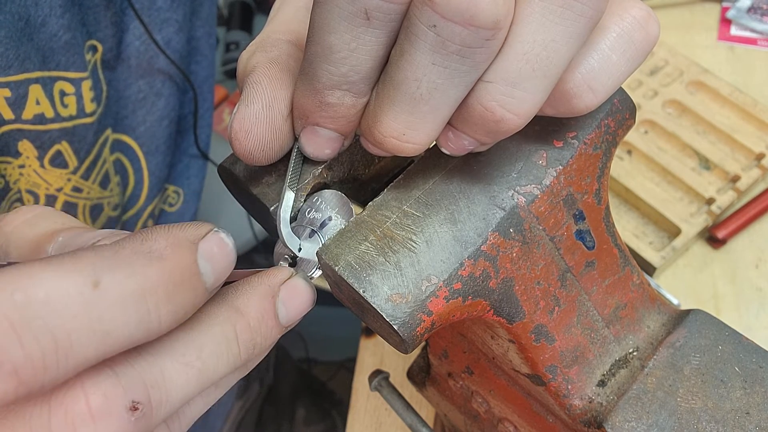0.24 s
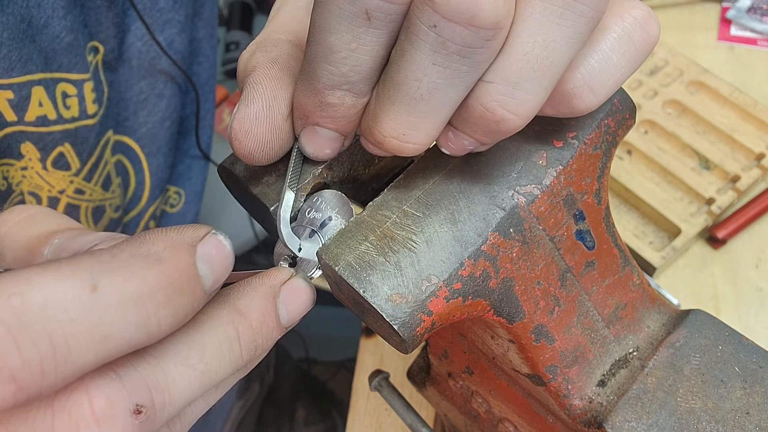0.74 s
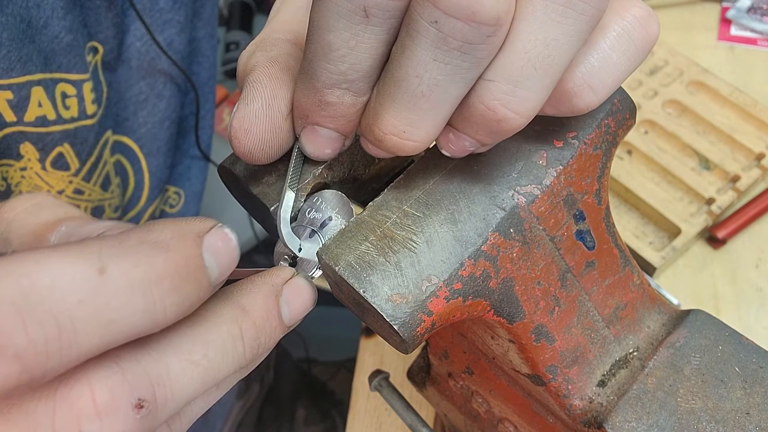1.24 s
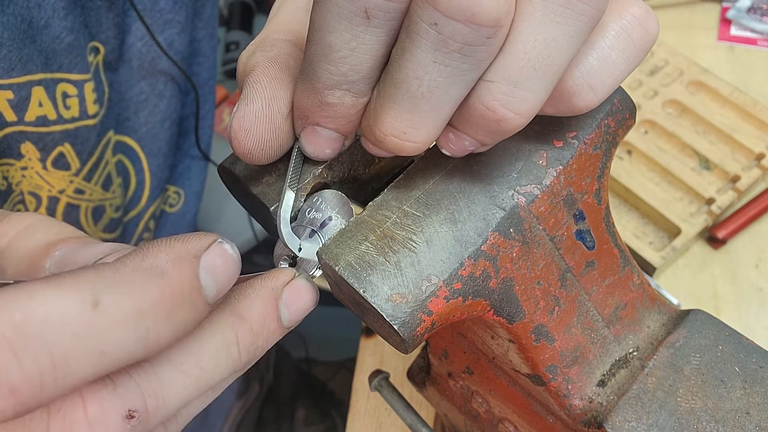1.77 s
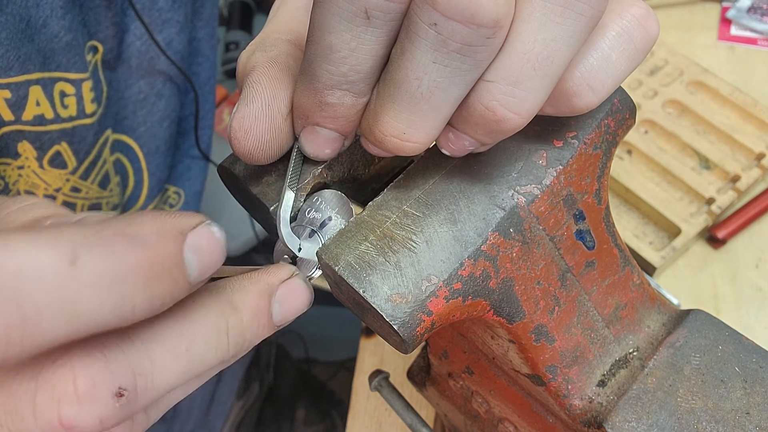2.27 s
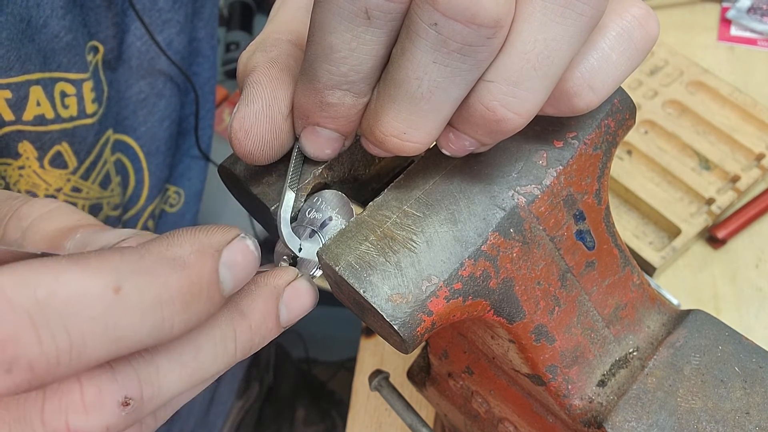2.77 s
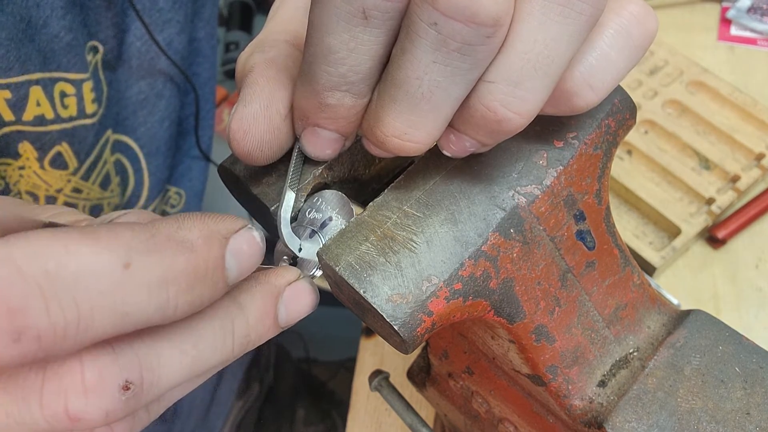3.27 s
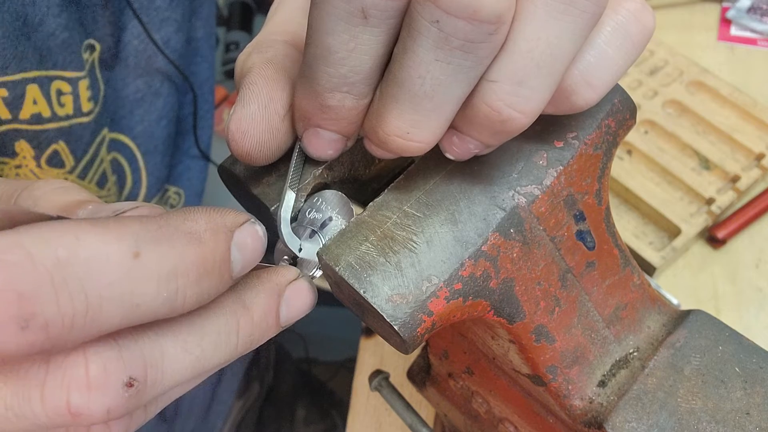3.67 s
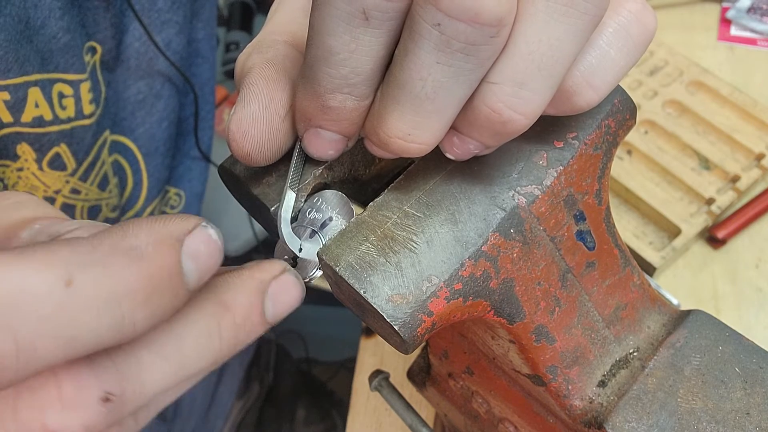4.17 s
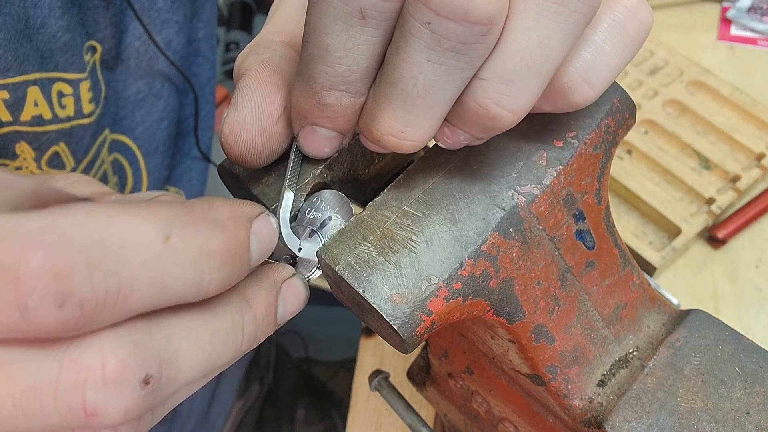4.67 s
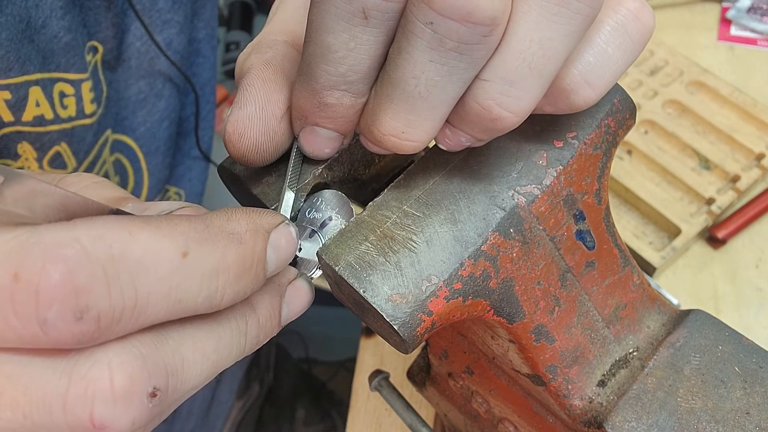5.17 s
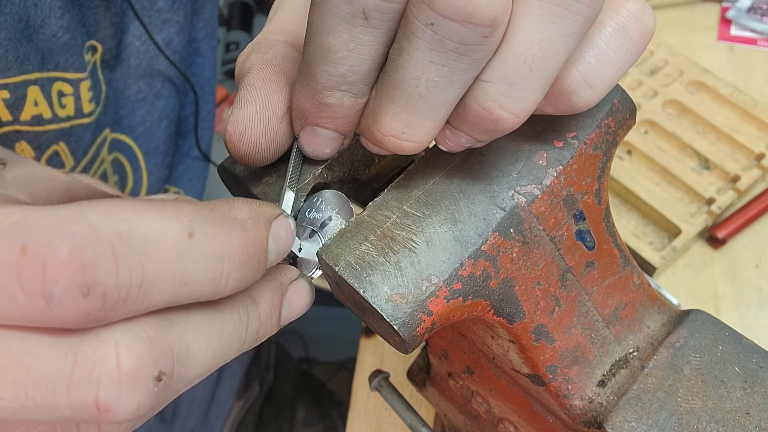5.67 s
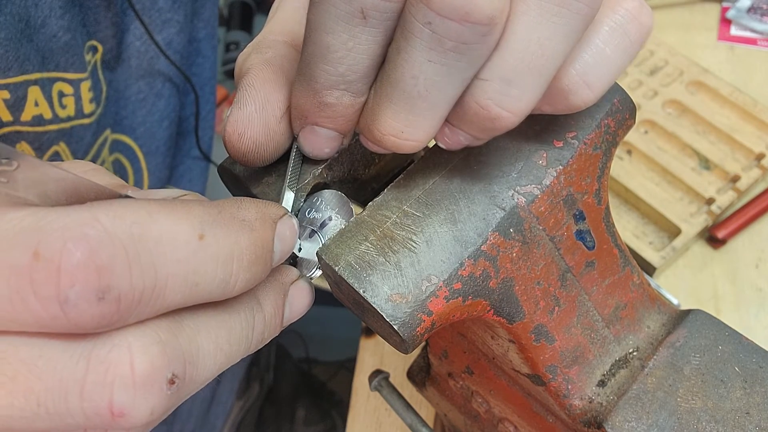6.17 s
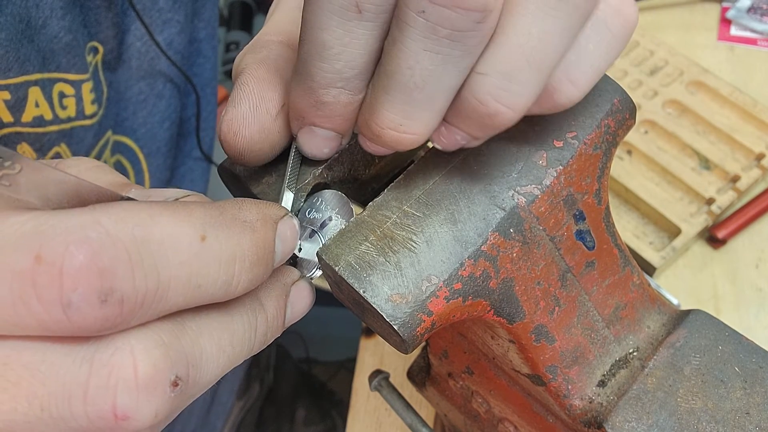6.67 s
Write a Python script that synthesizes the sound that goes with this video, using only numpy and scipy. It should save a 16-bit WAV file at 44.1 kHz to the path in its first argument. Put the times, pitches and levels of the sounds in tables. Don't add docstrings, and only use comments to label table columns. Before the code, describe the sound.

Crisp metallic clicks and tiny scratches of a pick inside a clamped lock cylinder, separated by pauses filled with a low unsteady hum.

```python
import sys
import numpy as np
from scipy import signal
from scipy.fft import next_fast_len
from scipy.io import wavfile
from scipy.ndimage import uniform_filter1d

SR = 44100
rng = np.random.default_rng(int(sys.argv[2]) if len(sys.argv) > 2 else 0)


def unload_audio(sound):
    columns = np.transpose(np.atleast_2d(sound))
    steps = np.round(np.clip(columns, -1, 1) * 32767)
    wavfile.write(sys.argv[1], SR, steps.astype(np.int16))


def rack_gain(trim_db):
    fader = np.asarray(trim_db, float)
    return 10 ** (fader / 20)


N = 306035

# t/s, tone level/dB, flutter depth [0-1, clipped above]
HUM = [(0, -40, 0.82), (.35, -48.5, 0.43), (.75, -53.5, 0.54), (1.0, -44, 1.13), (1.4, -52.5, 0.2),
       (1.8, -49, 0), (2.2, -42, 0.8), (2.4, -46.5, 0.56), (2.6, -42, 0.27), (3.7, -45, 0),
       (3.96, -40, 0.48), (4.3, -56.5, 1.23), (4.8, -54, 0.3), (5.05, -44, 0.43), (5.5, -42, 0.4),
       (5.849, -48.5, 0.1), (6.15, -40, 0.42), (6.94, -45.5, 0)]
# f/Hz, level/dB
WHINE = [(119.9, -59.5), (178, -70.5), (210, -67.5), (309, -68.5), (480, -78.5), (540, -71.5), (660, -75.5),
         (1000, -79), (1485, -103), (1500.2, -72.5), (1521, -100), (3000.4, -84)]
# f/Hz, level/dB per Hz
RUMBLE = [(15, -17), (25, -61), (41, -13.5), (65, -2.5), (91, -6), (119, -16.5), (275, -20), (312, -20.5),
          (446, -23.5), (533, -26), (1190, -35.5), (1530, -36.5), (1800, -42), (2340, -102), (3960, -120)]
# f/Hz, level/dB per Hz
HISS = [(1060, -29), (1800, -7), (2300, -11), (2850, -9.5), (3050, -5.5), (4500, -5), (6800, -6.5),
        (7200, -15.5), (10000, -12.5), (12800, -14.5), (13150, -4), (14100, -10.5), (15750, -10),
        (16000, -51)]

# t/s, tip peak level/dB, shank peak level/dB, favoured shank f/Hz
TICKS = [(0.3055, -17, -18.5, 8940), (0.3072, -21, -21.5, 6100), (1.54, -56, -56, 7000),
         (1.7265, -66, -59, 6500), (1.7365, -60, -54, 7040), (1.747, -58, -55, 5500),
         (1.7735, -56, -58, 9000), (1.9978, -28, -29.5, 5000), (1.9993, -16, -20, 8440),
         (2.182, -31, -31.5, 5500), (2.1845, -33, -30.5, 6300), (2.1871, -32, -29, 8400),
         (2.2015, -46, -39, 9000), (2.2262, -36, -37, 9800), (2.228, -37, -38, 8000),
         (2.292, -49, -52, 7000), (2.3034, -58, -48, 8400), (2.4456, -52, -48, 8400),
         (2.578, -60, -53, 8400), (4.076, -28, -29.5, 7500), (4.083, -36, -31, 8400),
         (4.0885, -42, -40, 5000), (4.092, -32, -36, 5000), (4.0948, -42, -45, 8400),
         (4.1122, -24, -26.5, 9300), (4.1187, -40, -41, 7500), (4.1273, -38, -40, 8400),
         (4.13, -34, -33, 6500), (4.132, -40, -39, 6000), (4.151, -62, -50, 9300), (4.1642, -24, -28, 8400),
         (4.1676, -22, -25, 8400), (4.1722, -25, -23, 9300), (4.1772, -24, -26, 7500),
         (4.18, -26, -24.5, 7400), (4.2332, -42, -33.5, 8400), (4.2445, -54, -39, 8600),
         (4.362, -56, -54, 8600), (4.4005, -56, -48, 5300), (4.4055, -41, -40.5, 6900),
         (4.5487, -47, -48, 6300), (4.585, -40, -34.5, 8400), (4.8428, -48, -37.5, 6200),
         (4.8506, -58, -41.5, 8005), (4.985, -58, -42, 7700), (4.99, -62, -46, 7700),
         (5.0152, -48, -34.5, 8400), (5.018, -52, -35, 5260), (5.108, -50, -58, 8400),
         (6.0404, -34, -31.5, 10200), (6.0412, -44, -42, 5740)]
# t/s, peak level/dB, favoured lock f/Hz
KNOCKS = [(0.3055, -36, 1600), (0.3072, -39, 3430), (1.54, -58, 2030), (1.7365, -67, 1562),
          (1.747, -63, 1600), (1.7735, -64, 1600), (1.9975, -37.5, 1880), (1.9993, -35.5, 3410),
          (2.182, -42.5, 1710), (2.1845, -40.5, 1830), (2.1871, -40, 2530), (2.205, -45, 1670),
          (2.2262, -47.5, 3100), (2.292, -54, 1560), (2.3034, -54, 3100), (2.4456, -60.5, 1709),
          (2.5442, -60, 1700), (2.578, -54, 1790), (2.757, -57, 1830), (4.068, -50, 1600),
          (4.076, -54, 1600), (4.0834, -40, 3180), (4.0935, -47.5, 1600), (4.1125, -42.5, 2760),
          (4.1165, -46, 3200), (4.1305, -43, 2170), (4.134, -47, 3200), (4.15, -53, 2030),
          (4.1642, -35, 3260), (4.1676, -37, 1670), (4.1722, -36.5, 2185), (4.1759, -37.5, 1820),
          (4.1802, -37, 3140), (4.234, -44.5, 2080), (4.245, -54, 1700), (4.4001, -48, 3175),
          (4.4044, -49.5, 3250), (4.5487, -55, 1790), (4.585, -46.5, 2170), (4.8428, -50, 1930),
          (4.849, -49.5, 2300), (4.985, -59, 3100), (5.0135, -50, 1630), (5.1073, -65, 1670),
          (6.0404, -55.5, 1670), (6.318, -56.5, 1950), (6.326, -57, 1690), (6.342, -59, 2000)]
# t/s, vise peak level/dB, favoured f/Hz
JOLTS = [(0.306, -33.5, 1196), (0.311, -42, 420), (1.9975, -40.5, 1180), (2.001, -40, 440),
         (2.187, -49, 1160), (4.079, -49, 450), (4.128, -48.5, 450), (4.166, -45, 1300), (4.172, -46, 1330),
         (5.02, -55, 800), (6.318, -52.5, 1100), (6.33, -60, 800), (6.362, -54, 1170)]
# t/s, level/dB
HARD_HITS = [
    (0.307, -56),
    (1.9985, -47),
    (4.167, -62),
]
# t/s, level/dB
TWANGS = [
    (2.206, -51),
    (5.0135, -46.5),
    (6.043, -61),
    (0.32, -54),
]
# start t/s, hardest t/s [held inside the stroke], end t/s [at least 0.011 after
# start], lock level/dB, shank level/dB against the lock
STROKES = [(1.46, 1.533, 1.64, -57.5, -20), (1.72, 1.74, 1.9, -70, -6), (2.187, 2.1, 2.21, -38, -11),
           (2.228, 2.08, 2.4, -57, -7.5), (2.264, 2.2, 2.34, -51.5, -12), (2.428, 2.6, 2.54, -60, -4),
           (2.51, 2.58, 2.55, -60, -18), (2.746, 2.84, 2.8, -62, -7), (3.947, 3.9, 4.2, -58.5, -18),
           (4.067, 4.069, 3.6, -47, -16), (4.079, 4.09, 4.2, -54, -3), (4.11, 3.3, 4.1, -46, -9),
           (4.1636, 4.168, 4.157, -27.5, -7.5), (4.171, 4.179, 4.191, -28.5, -7),
           (4.195, 4.242, 4.295, -56, -9), (4.331, 4.372, 4.47, -54.5, -13), (4.403, 4, 4.53, -54, -11),
           (4.525, 4.537, 4.6, -58, -5), (4.543, 4.553, 4.64, -56, -2.5), (4.552, 4.568, 4.54, -51, -11),
           (4.5, 4.56, 4.54, -56.5, -25), (4.587, 4.7, 4.2, -50.5, -8), (4.841, 4.847, 4.93, -51, -12),
           (4.984, 4.9, 5.26, -60, -6)]

# f/Hz, level/dB, time to fall 60 dB t/s
TIP = [(12000, -9, 0.0021), (13720, -0.5, 0.0052), (15100, -6.5, 0.0025), (16100, -16, .0015)]
# f/Hz, level/dB, time to fall 60 dB t/s
SHANK = [(4570, -20, 0.0044), (5000, -3.5, 0.0086), (6300, -1.5, .004), (7500, -1, 0.0056),
         (8400, 0, 0.0045), (9300, 0.5, 0.0046), (10200, 1, 0.0028), (11200, -11, 0.0012)]
# f/Hz, level/dB, time to fall 60 dB t/s
LOCK = [(1600, 7.5, 0.026), (1670, -3, 0.12), (1806, -6, 0.081), (1980, 1.5, 0.058), (2074, 2, 0.028),
        (2185, 0, 0.055), (2530, -3.5, 0.038), (2753, -3, 0.05), (3091, 1, 0.037), (3260, 0, 0.042),
        (3410, 1, 0.04), (4090, -13, 0.12)]
# f/Hz, level/dB, time to fall 60 dB t/s
VISE = [(420.5, 1, 0.095), (473, -8.5, 0.16), (849, -12, 0.14), (1097, 0.5, 0.043), (1170, -0.5, 0.049),
        (1279, 1.5, 0.093), (1333, -3, 0.051)]
# f/Hz, level/dB, time to fall 60 dB t/s
CLAMP = [(1850, 11, 0.08), (1850, -6, 0.16), (1940, 1, .16), (2760, 5, 0.046), (2820, -18, 0.22),
         (3360, 4, 0.065), (3450, -5.5, 0.49), (3480, 7, .12), (4150, 4, .045), (3980, -11, .2)]
# f/Hz, level/dB, time to fall 60 dB t/s
WRENCH = [(1650, -1.5, 0.25), (1593, -3, 0.2), (1660, -14, 0.14)]

# f/Hz, time to fall 60 dB t/s
ECHO_TIMES = [(400, 0.5), (1300, 0.4), (3000, 0.41), (6000, 0.39), (12000, 0.34)]
# f/Hz, level/dB
SOFT_WALLS = [(400, 8), (1500, 9), (4000, -0.5), (9000, -2), (14000, -4)]

HUM_HZ, HUM_DRIFT_HZ = 57.58, 0.66
RUMBLE_DB, HISS_DB = -49.5, -67
SNAP_DB, TOUCH_RING_SHARE = -21, 0.45
VISE_UNDER_LOCK_DB = -18
FIRM_DB = -50
FIRM_SCRAPE_HZ, LIGHT_SCRAPE_HZ, SHANK_SCRAPE_HZ = 2670, 1900, 6500
PRESS_DB, LIFT_DB = -8.5, -26
LOW_BLUR_RAD, HIGH_BLUR_RAD = 0.07, 0.4
BENCH_DB, BENCH_T60_S, BENCH_LOW_HZ, BENCH_HIGH_HZ = -6, 0.02, 2570, 11900
ROOM_DB, ECHO_EDGE_HZ = -10, 16000


def evened(x):
    return x / np.sqrt(np.mean(x ** 2) + 1e-20)


def read(points, hz):
    f, value = np.transpose(points)
    return np.interp(np.log(hz + 1), np.log(f + 1), value)


def add(mix, s, sound):
    part = mix[round(s * SR):][:len(sound)]
    part += sound[:len(part)]


def filtered(x, order, edge_hz, kind):
    return signal.sosfilt(signal.butter(order, edge_hz, kind, fs=SR, output="sos"), x)


def wander(low_hz, high_hz):
    t = np.arange(0, N + 256, 256) / SR
    speeds = np.geomspace(low_hz, high_hz, num=14)
    slow = sum(np.sin(2 * np.pi * (f * t + rng.random())) for f in speeds)
    return evened(np.interp(np.arange(N) / SR, t, slow))


def air(shape, size, patchy_db):
    frames, hz = N * 4 // size + 5, np.fft.rfftfreq(size, 1 / SR)
    a, b, patches = rng.standard_normal((frames, size // 2 + 1, 3)).T
    patches = uniform_filter1d(patches, size=12, axis=0)
    patches = evened(uniform_filter1d(patches, size=10, axis=1))
    spectra = (a + 1j * b) * rack_gain(read(shape, hz)[:, None] + patchy_db * patches)
    return evened(signal.istft(spectra, nperseg=size, noverlap=size * 3 // 4)[1][:N])


def machine():
    s, db, flutter = np.transpose(HUM)
    t = np.arange(N) / SR
    depth = np.clip(np.interp(t, s, flutter), 0, 1)
    swing = np.sqrt(1 - depth ** 2) + depth * wander(3.5, 19)
    turns = np.cumsum(HUM_HZ + HUM_DRIFT_HZ * wander(0.296, 7.3)) / SR
    sound = np.sqrt(2) * rack_gain(np.interp(t, s, db)) * swing * np.sin(2 * np.pi * turns)
    for f, whine_db in WHINE:
        level = np.sqrt(2) * rack_gain(whine_db + 2.74 * wander(0.522, 12))
        sound += level * np.sin(2 * np.pi * (f * t + rng.random()))
    rumble = rack_gain(RUMBLE_DB) * air(RUMBLE, size=4096, patchy_db=1.5)
    hiss = rack_gain(HISS_DB) * air(HISS, size=512, patchy_db=1.0)
    return sound + rumble + hiss


def ring(modes, spread_db, detune, near_hz=None, focus_db=0):
    hz, db, t60 = np.transpose(modes)[:, :, None]
    pitch_chance, level_chance = rng.standard_normal((2, len(modes), 1))
    t = np.arange(8000) / SR
    if near_hz:
        db = db - np.minimum(40 * abs(np.log2(hz / near_hz)), focus_db)
    signs = (-1) ** np.arange(len(modes))[:, None]
    waves = signs * np.sin(2 * np.pi * hz * (1 + detune * pitch_chance) * t)
    fading = rack_gain(db + spread_db * level_chance - 60 * t / np.maximum(t60, 0.002))
    return (fading * waves).sum(0)


def blow(modes, peak_db, chatter_s, first, near_hz=None, focus_db=0):
    t = np.arange(900) / SR
    blows = rng.standard_normal(900) * (1 - np.exp(-t / 0.00031)) * np.exp(-t / chatter_s)
    blows[8] += first * np.linalg.norm(blows)
    part = signal.fftconvolve(blows, ring(modes, 0.36, 0.012, near_hz, focus_db))
    return rack_gain(peak_db) * part / abs(part).max()


def tick(tip_db, shank_db, shank_hz):
    chatter_s = 0.0004 * rack_gain(0.2 * (max(tip_db, shank_db) + 30))
    held = 1 if tip_db > SNAP_DB else TOUCH_RING_SHARE
    tip_modes = [(hz, db + (1 - held) * hz / 2000 - 4, t60 * held) for hz, db, t60 in TIP]
    tip = blow(tip_modes, tip_db, chatter_s, 1.3)
    shank = blow(SHANK, shank_db, chatter_s + 0.0001, 0.85, shank_hz, focus_db=9.5)
    return tip[:4000] + shank[:4000]


def knock(lock_db, lock_hz):
    focus_db = np.clip(-0.45 * (lock_db + 22), 9, 14)
    lock = blow(LOCK, lock_db + 4.5, 0.0024, 1.46, lock_hz, focus_db)
    return lock + jolt(lock_db + VISE_UNDER_LOCK_DB)


def jolt(vise_db, vise_hz=None):
    return blow(VISE, vise_db + 5.5, 0.0051, 2.6, vise_hz, focus_db=7.5)


def scattered(x):
    low = filtered(x, 4, BENCH_LOW_HZ * 1.79, "low")
    high = filtered(x, 4, BENCH_LOW_HZ * 1.36, "high")
    steps = np.cumsum(rng.standard_normal(N))
    blurred = np.zeros(N)
    for part, rad in ((low, LOW_BLUR_RAD), (high, HIGH_BLUR_RAD)):
        turning = signal.hilbert(part, next_fast_len(N))[:N]
        blurred += (turning * np.exp(1j * rad * steps)).real
    return blurred


def take_turns(x, echoes, turn_s):
    turn = np.pi * np.arange(N) / SR / turn_s
    return sum(signal.oaconvolve(x * np.sqrt(2 / 3) * np.sin(turn + k * np.pi / 3), echo)[:N]
               for k, echo in enumerate(echoes))


def bench(x):
    t = np.arange(2000) / SR
    sprays = rng.standard_normal((3, len(t))) * rack_gain(-60 * t / BENCH_T60_S) * (t > 0.0012)
    bright = filtered(x, 2, (BENCH_LOW_HZ, BENCH_HIGH_HZ), "band")
    return take_turns(bright, [spray / np.linalg.norm(spray) for spray in sprays], turn_s=0.011)


def clamped_cylinder(clamp_db):
    return rack_gain(clamp_db) * ring(CLAMP, 1.0, 0.0022)


def workshop(x):
    taps = np.zeros((3, SR // 2))
    at = np.arange(160, SR // 2 - 20, 20)
    places = at + rng.integers(0, 20, (3, len(at)))
    np.put_along_axis(taps, places, rng.choice([-1., 1.], (3, len(at))), axis=1)
    hz, t, spectra = signal.stft(taps, SR, nperseg=256)
    fading_db = read(SOFT_WALLS, hz)[:, None] - 60 * t / read(ECHO_TIMES, hz)[:, None]
    tails = signal.istft(spectra * rack_gain(fading_db), SR, nperseg=256)[1]
    return take_turns(x, tails / 12, turn_s=0.007)


def wrench(wrench_db):
    return rack_gain(wrench_db) * ring(WRENCH, 1.3, 0.0026)


def scrape(slips, modes, near_hz, focus_db):
    damped = rack_gain(-1200 * np.arange(8000) / SR)
    ringing = ring(modes, 1.0, 0.03, near_hz, focus_db) * damped
    return evened(signal.fftconvolve(slips, ringing)[:len(slips)])


def stroke(start, hardest, end, lock_db, shank_db):
    t = np.arange(start, max(end, start + 0.011), 1 / SR)
    slips = (rng.random(len(t)) < 2500 / SR) * rng.standard_normal(len(t))
    slips = slips * signal.windows.tukey(len(t), 0.15)
    lock_hz = FIRM_SCRAPE_HZ if lock_db > FIRM_DB else LIGHT_SCRAPE_HZ
    lock = scrape(slips, LOCK, lock_hz, focus_db=6.5)
    shank = scrape(slips, SHANK + TIP, SHANK_SCRAPE_HZ, focus_db=9)
    shank = evened(filtered(shank, 2, [4600, 15500], "band"))
    moments = [t[0], np.clip(hardest, t[1], t[-2]), t[-1]]
    press_db = np.interp(t, moments, [PRESS_DB, 0, LIFT_DB])
    return rack_gain(lock_db + press_db - 5.0) * (lock + rack_gain(shank_db + 6.5) * shank)


def scene():
    hum, work = machine(), np.zeros(N)
    sources = ((TICKS, tick), (KNOCKS, knock), (JOLTS, jolt), (HARD_HITS, clamped_cylinder), (TWANGS, wrench))
    for table, sound in sources:
        for s, *row in table:
            add(work, s, sound(*row))
    for row in STROKES:
        add(work, row[0], stroke(*row))
    far = filtered(scattered(work), 10, ECHO_EDGE_HZ, "low")
    spray = rack_gain(BENCH_DB) * bench(far)
    room = rack_gain(ROOM_DB) * workshop(far + spray)
    return (work + spray + room + hum)[None]


def band_limit(x):
    return signal.sosfilt(signal.butter(12, 16990, fs=SR, output="sos"), x)


def record(dry):
    limited = signal.oaconvolve(dry, signal.firwin(255, 16650, fs=SR)[None], "same")
    return band_limit(limited)


dry = scene()
out = record(dry)
unload_audio(out)
```